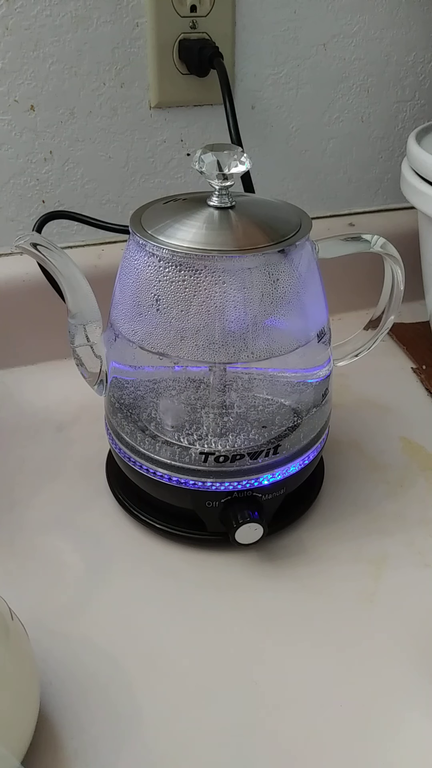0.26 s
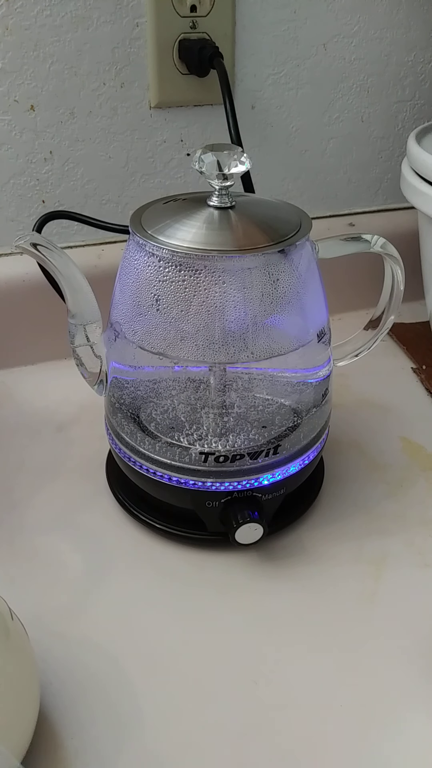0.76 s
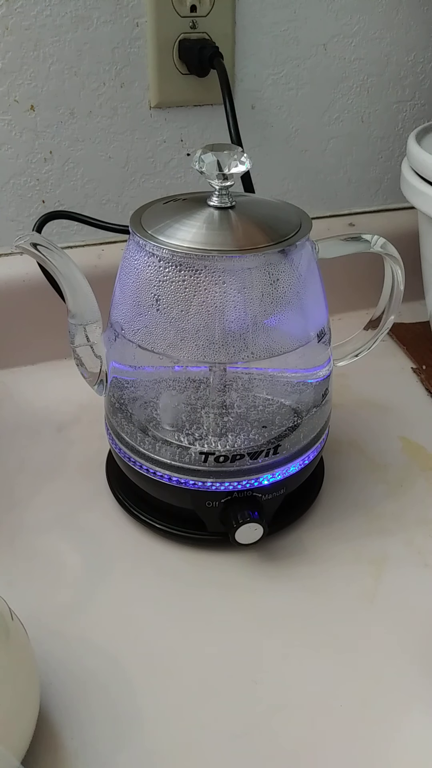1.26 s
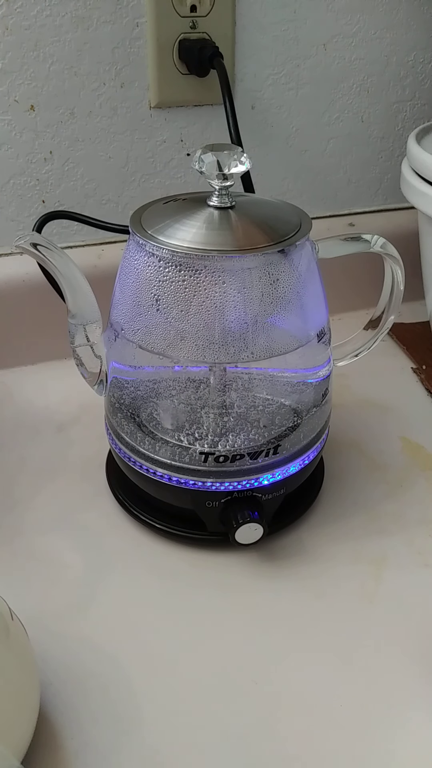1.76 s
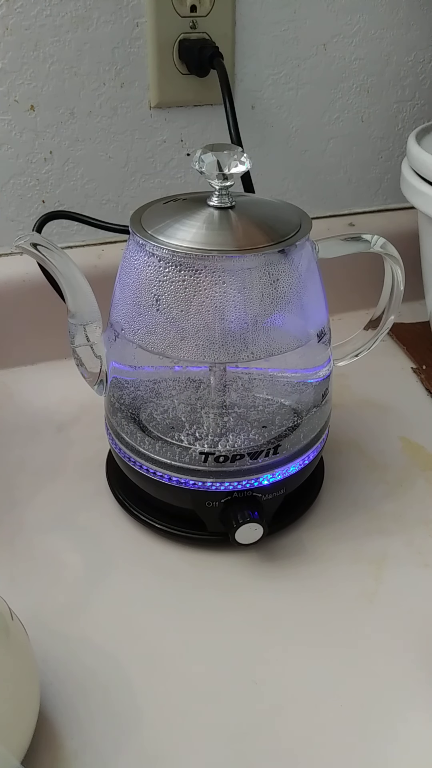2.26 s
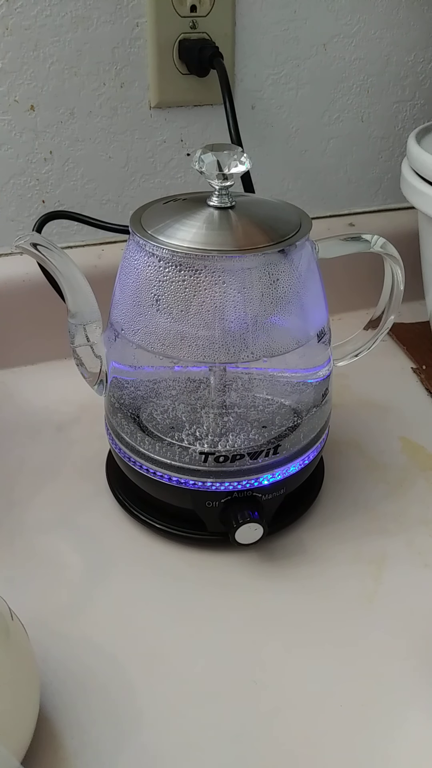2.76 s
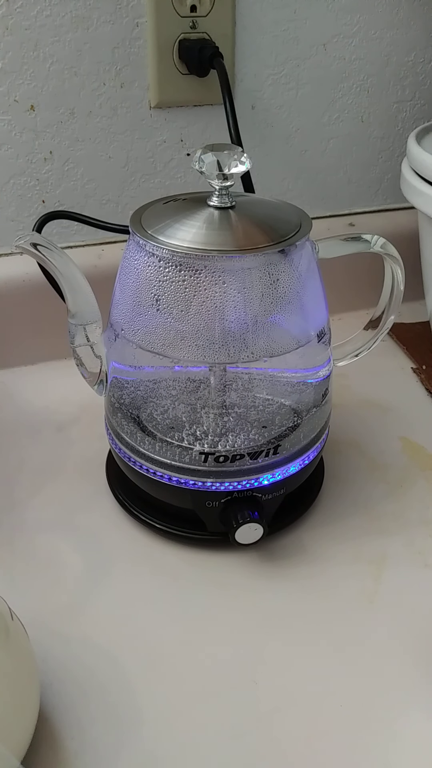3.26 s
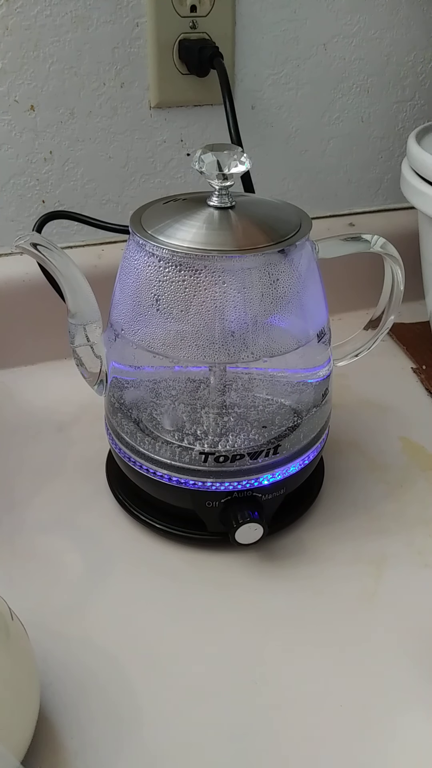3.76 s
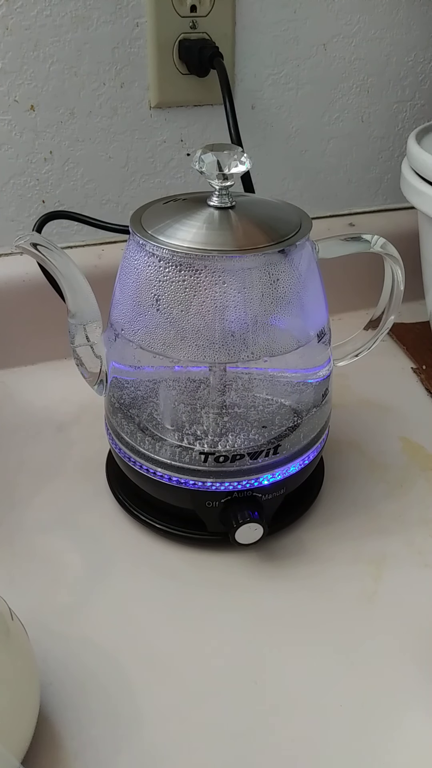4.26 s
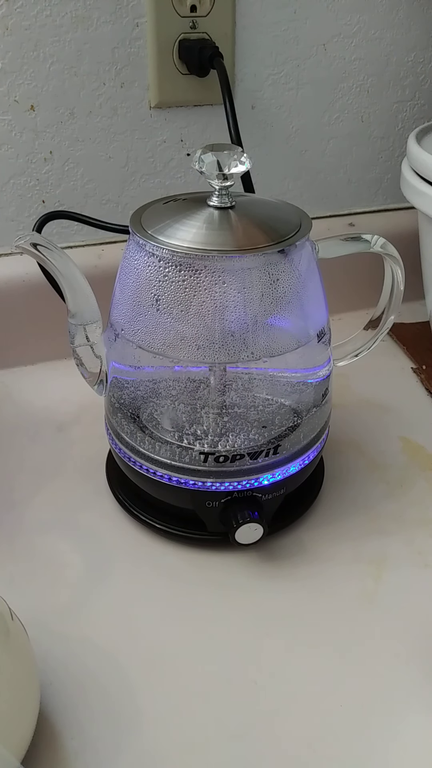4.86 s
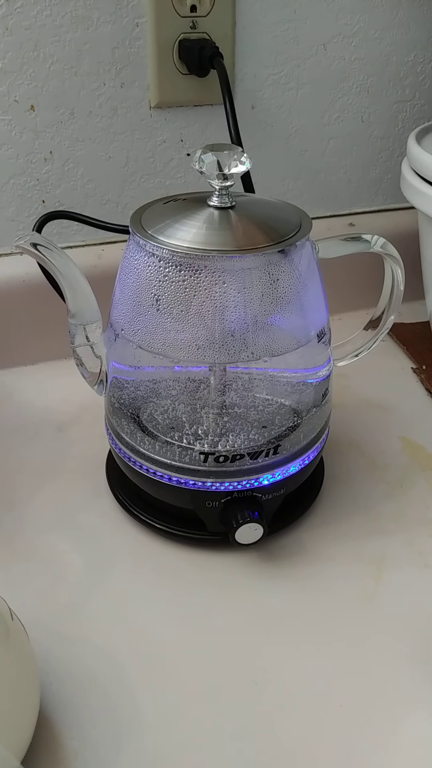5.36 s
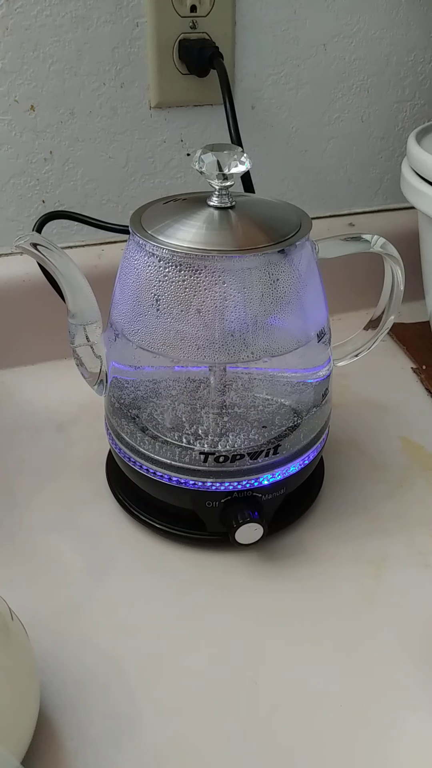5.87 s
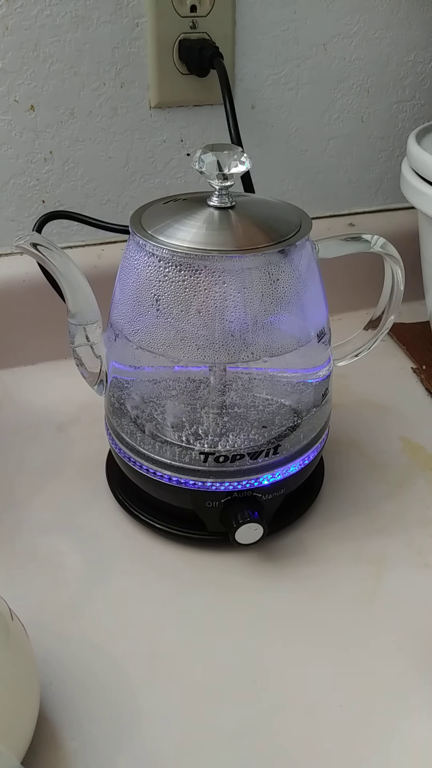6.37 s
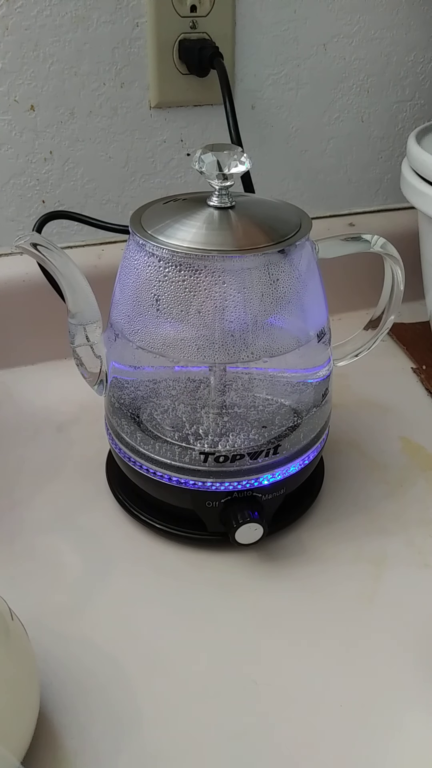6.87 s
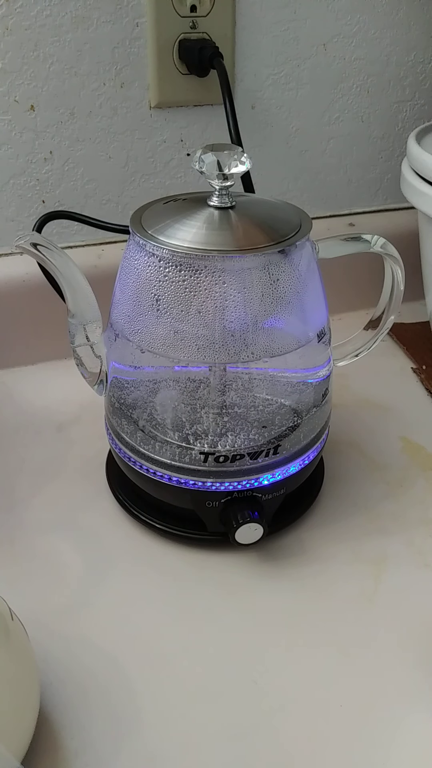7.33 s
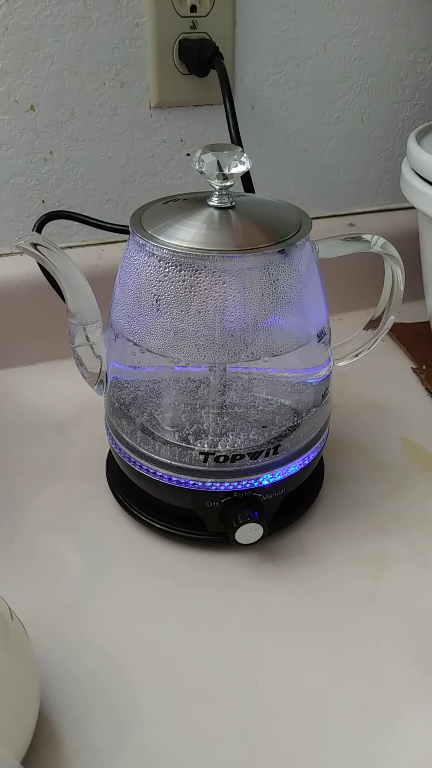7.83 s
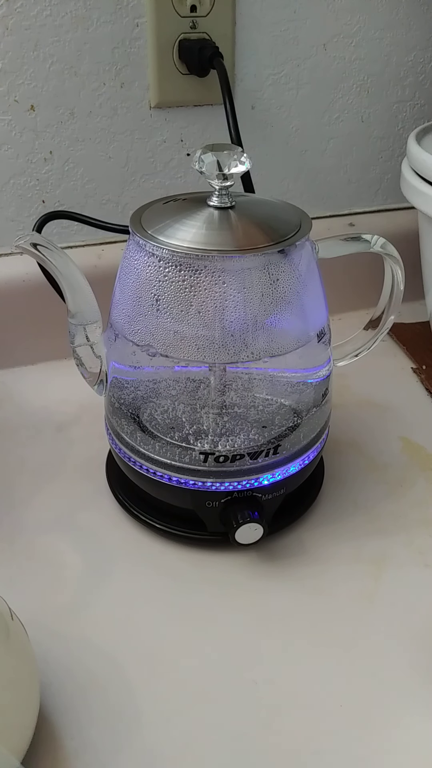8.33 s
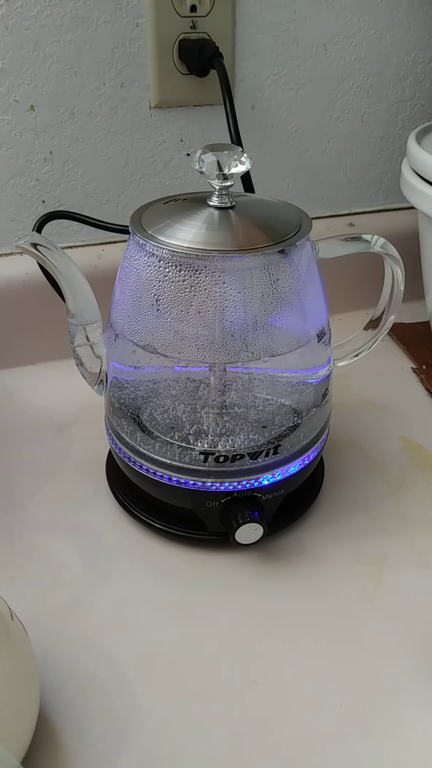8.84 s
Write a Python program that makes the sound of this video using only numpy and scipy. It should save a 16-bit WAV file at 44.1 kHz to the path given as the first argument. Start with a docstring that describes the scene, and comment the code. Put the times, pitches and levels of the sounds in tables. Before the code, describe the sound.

Close up, a glass kettle at a rolling boil grumbles and knocks, with sizzling sprays of fine bubbles and one dry tick.

```python
"""A low, uneven rumble and a glassy hiss come first: water boiling hard in a glass kettle, close to a phone.
Steam bubbles collapse on the heater plate and thump the kettle body; decaying modes make its knock.
Sprays of tiny bubbles are shaped noise that makes glass and steel sizzle; single bubbles plop and sing.
A dry tick of the casing comes once. The mains hums faintly under the quiet kitchen, and the counter and
walls return a short dull tail."""
import sys
import numpy as np
from scipy import signal
from scipy.fft import rfft, irfft
from scipy.io import wavfile
from scipy.ndimage import uniform_filter1d

SR = 44100
rng = np.random.default_rng(int(sys.argv[2]) if len(sys.argv) > 2 else 0)


def to_wav(s):
    """Save 16-bit WAV."""
    ch = np.atleast_2d(s).T  # columns
    pcm = np.round(np.clip(ch, -1, 1) * 32767)  # PCM
    wavfile.write(sys.argv[1], SR, pcm.astype(np.int16))


N = 401310  # samples

# large bubbles collapsing: start_s, peak_db, pitch_hz, snap_db (against the thump)
THUMPS = [(0.037, -22, 252, -10.5), (0.168, -23.5, 254, -2.5), (0.199, -20, 344, -15),
          (0.526, -16.5, 328, -13.5), (0.786, -15, 333, -9), (0.883, -29.5, 248, -1),
          (1.035, -20.5, 323, -1.5), (1.049, -13, 350, -6.5), (1.311, -26.5, 348, -4),
          (1.886, -22.5, 293, -21), (2.178, -25.5, 342, -0.5), (2.203, -26, 270, -20),
          (2.309, -21.5, 308, -11), (2.966, -17, 363, -7.5), (3.065, -26, 249, -7.5),
          (3.261, -23, 357, -9.5), (3.364, -21, 262, -10), (3.504, -24, 392, -9), (3.841, -18.5, 377, -8),
          (4.14, -18.5, 257, -2.5), (4.35, -18.5, 345, -2), (4.492, -22.5, 328, -4.5),
          (4.768, -19.5, 260, -7), (4.979, -17.5, 325, -18), (5.032, -22.5, 335, -20),
          (5.657, -21, 276, -1.5), (5.795, -26.5, 340, -2), (5.873, -25, 260, -13.5),
          (5.915, -21.5, 296, -8), (6.023, -25, 360, -10.5), (6.093, -26.5, 348, -11),
          (6.11, -18.5, 284, -8.5), (6.19, -24, 254, -5.5), (6.31, -16.5, 352, 0), (6.354, -16.5, 301, -11),
          (6.484, -16, 390, -4.5), (6.788, -13.5, 324, -9.5), (6.889, -28, 261, -2),
          (7.112, -17, 273, -6.5), (7.402, -16, 370, -7), (7.43, -19, 290, -7.5), (7.67, -17.5, 275, -14),
          (7.715, -22, 334, -15), (7.787, -24, 304, -17), (8.056, -24.5, 277, -8.5),
          (8.147, -25.5, 344, -17), (8.318, -19, 296, -9.5), (8.339, -19.5, 265, -21.5),
          (8.631, -24.5, 338, -8), (8.715, -27.5, 336, -6), (8.845, -23.5, 229, -7),
          (8.904, -24.5, 272, -5.5), (9.066, -20, 340, -7)]
# modes of the kettle body and counter: mode_hz, level_db, t60_s
BODY = [(152, -7, 0.08), (214, -9, 0.09), (250, -2, 0.13), (272, -6, 0.1), (337, -3, 0.11),
        (365.3, -2.5, 0.065), (413.6, -4.5, 0.054), (478, -5.5, 0.053), (523.5, -11.5, 0.082),
        (607.6, -10.5, 0.072), (680, -6.5, 0.051), (807, -17, 0.08), (1030, -14.5, 0.045)]

SHED_SPREAD_DB = 9  # how far the bubbles that follow a large one differ in level
PLINK_CYCLES, PLINK_GLIDE = 1.6, .025  # decay in swings; share of its pitch gained with each swing


def amp(db):
    """Turn decibels into a factor on amplitude."""
    return 10 ** (np.asarray(db) / 20)


def level(x, db):
    """Set the RMS level in dB."""
    return x * amp(db) / np.sqrt(np.mean(x ** 2))


def peak(x, db):
    """Set the peak level in dB."""
    return x * amp(db) / np.abs(x).max()


def above(x, hz):
    """Keep what lies above a frequency."""
    return signal.sosfilt(signal.butter(3, hz, "high", fs=SR, output="sos"), x)


def add(out, s, piece):
    """Lay a piece into the sound at s seconds, cut off at the end."""
    i = int(s * SR)
    out[i:i + len(piece)] += piece[:max(N - i, 0)]


def coloured(points):
    """Steady noise at 0 dB RMS whose spectrum follows (Hz, dB) points."""
    hz, db = np.transpose(points)
    bins_hz = np.fft.rfftfreq(N, 1 / SR)
    gain = amp(np.interp(np.log(bins_hz + 1), np.log(hz), db))
    return level(irfft(rfft(rng.standard_normal(N)) * gain, N), 0)


def wander(db, s):
    """Gain that drifts at random by some dB (RMS), smoothed twice over s seconds."""
    size = int(s * SR)
    drift = uniform_filter1d(uniform_filter1d(rng.standard_normal(N), size), size)
    return amp(db * level(drift, 0))


def swarm(per_s, spread_db):
    """Rows (start_s, level_db, chance 0-1) of random events, most small and some larger."""
    draw = rng.random((int(per_s * N / SR), 3))
    start_s = draw[:, 0] * N / SR
    level_db = -spread_db * np.log(1 - .95 * draw[:, 1])
    return np.c_[start_s, level_db, draw[:, 2]]


def ring(modes, scatter_db=0.):
    """Response of decaying modes to one short push; where it lands shifts their strengths."""
    t = np.arange(SR // 7) / SR
    luck_db = scatter_db * rng.standard_normal(len(modes))
    out = np.zeros(len(t))
    for shift_db, (hz, db, t60) in zip(luck_db, modes):
        decay = amp(-60 * t / max(t60, .005))  # no mode dies faster than 5 ms
        out += amp(db + shift_db) * np.sin(2 * np.pi * hz * t) * decay
    return out


def bubble(hz, cycles, glide=0.):
    """A bubble swells into a few swings at its own pitch, perhaps rising, and dies."""
    turns = np.arange(int(12 * cycles * SR / hz)) / SR * hz
    swing = np.sin(2 * np.pi * turns * (1 + glide * turns / 2))
    return swing * turns * np.exp(-turns / cycles)


def stir():
    """Level of the boil: calm, lifted for a moment after each large bubble."""
    calm_db, lift_db, settle_t60_s = -39.5, -16.5, 0.21  # lift is against the bubble's peak
    t = np.arange(SR // 2) / SR
    power = np.full(N, amp(calm_db) ** 2)
    for s, db, _, _ in THUMPS:
        add(power, s, amp(db + lift_db - 60 * t / settle_t60_s) ** 2)
    return np.sqrt(np.abs(uniform_filter1d(power, size=SR // 200)))


def rumble():
    """Many smaller bubbles of all sizes, on several spots of the plate, keep the body grumbling."""
    out = 0
    for spot in range(3):
        push = np.zeros(N)
        for s, db, chance in swarm(170, spread_db=2.5):
            hz = 150 * (1200 / 150) ** chance
            add(push, s, amp(db) * (hz / 300) ** 0.43 * bubble(hz, cycles=0.79))
        out = out + signal.fftconvolve(push, ring(BODY, scatter_db=1.0))[:N]
    # the boil sags and swells between gulps
    return level(out, 0) * stir() * wander(2.5, 0.034)


def spray(hiss, sprays, fizz_db, t60, rise_s=0.0014):
    """One size of bubble: sprays start abruptly and thin out over a steady fizz."""
    t = np.arange(SR // 8) / SR
    fade = (1 - np.exp(-t / rise_s)) * amp(-60 * t / t60)
    power = np.full(N, amp(fizz_db) ** 2)
    for s, db in sprays:
        add(power, s, (amp(db) * fade) ** 2)
    # a spray is made of separate crackles: grains of 4 ms that differ by 1.5 dB
    grains = uniform_filter1d(rng.standard_normal(N), int(.004 * SR))
    crackle = amp(1.5 * level(grains, 0))
    # the mean hiss lies a few dB under its peaks
    return np.sqrt(power) * level(hiss * crackle, -8.5)


def glass_hiss():
    """Broad hiss of tiny bubbles drives the narrow resonances of glass and steel."""
    # broad colour of the sizzle: band_hz, level_db (per Hz, relative)
    hiss_colour = [(500, -22.5), (1100, 17), (1400, -5), (1900, 0), (2900, -15), (4200, -15), (6300, -12),
                   (7000, -17), (11000, -21.5), (12200, -30.5), (16000, -26)]
    # resonances of the glass wall and steel plate: ring_hz, width_hz, level_db (relative to each other)
    glass_modes = [(1035, 55, 1), (1650, 455, 4.5), (2330, 47, -1), (3203, 40, -1), (3844, 86, -2.5),
                   (4634, 110, -5.5), (4942, 50, -5), (5390, 40, -4), (5960, 40, -6), (6350, 50, -5),
                   (6570, 25, -2), (7140, 50, -2), (7800, 120, -3), (8110, 60, -6), (9620, 300, -12),
                   (10320, 60, -5), (10550, 55, -2), (10850, 70, -3), (11600, 120, -3)]
    hiss = coloured(hiss_colour)
    rings = np.zeros(N)
    for hz, width, db in glass_modes:
        tone = signal.lfilter(*signal.iirpeak(hz, hz / width, SR), hiss)
        # each ring of the glass swells and fades on its own
        rings += amp(db) * tone * wander(3.5, .018)
    return hiss + amp(8) * rings


def sizzle():
    """Coarse, middling and fine bubbles hiss in sprays, with pinpoint bubbles that burst all at once."""
    # large sprays: start_s, peak_db, fineness_db (treble above 7 kHz against the peak)
    large_sprays = [(0.0416, -45.5, -1), (0.188, -37, -4.5), (0.375, -43, -7), (0.5306, -36, -14),
                    (0.883, -35, -11), (0.959, -37.5, -21), (1.042, -36, -17), (1.227, -37, -24),
                    (1.371, -38, -4.5), (1.534, -40, -8), (1.604, -35, -19), (1.665, -43.5, -10),
                    (2.129, -43.5, -2), (2.161, -42.5, -2), (2.181, -42.5, -2), (2.312, -40.5, -5.5),
                    (2.515, -40, -21), (2.609, -37.5, -15), (2.6743, -38, -10), (2.94, -45.5, -2),
                    (2.978, -42, -9), (3.07, -42, -3), (3.299, -37.5, -8), (3.367, -38, -4.5),
                    (3.399, -41, -6), (3.589, -38.5, -11), (4.143, -33.5, -13), (4.25, -44, -7),
                    (4.403, -42, -6), (4.495, -40, -7.5), (4.771, -36.5, -12), (4.993, -41.5, -25),
                    (5.109, -42, -2.5), (5.581, -44, -15), (5.597, -38, -8), (5.66, -38.5, -8),
                    (5.917, -40.5, -9), (5.972, -48, 3), (6.001, -35.5, -9), (6.112, -42, -6),
                    (6.269, -46.5, -2), (6.326, -33, -13), (6.607, -46, -4), (6.721, -37.5, -9.5),
                    (6.816, -38, -5), (6.8668, -43, -2), (6.892, -38.5, -5), (7.115, -36.5, -8),
                    (7.3963, -33, -11), (7.592, -42, -25), (7.668, -38, -8.5), (7.8146, -40.5, -4),
                    (7.949, -35.5, -17), (8.042, -33, -12), (8.1443, -33.5, -7), (8.346, -41.5, 0),
                    (8.5096, -40.5, -11), (8.605, -35, -10), (8.6398, -38.5, -6), (8.721, -48, -2),
                    (8.805, -37.5, -13), (8.853, -37, -6), (8.9396, -40.5, -1), (9.065, -36.5, -13)]
    large_s, large_db, high_db = np.transpose(large_sprays)
    thump_s, thump_db, _, snap_db = np.transpose(THUMPS)
    hiss = glass_hiss()
    # each layer keeps all above its edge, without delay
    upper, top = (signal.sosfiltfilt(signal.butter(3, hz, "high", fs=SR, output="sos"), hiss)
                  for hz in (2600, 6900))

    # small sprays come between the large ones, each with its own mix of coarse, middling and fine
    small_s, small_db, _ = swarm(60, spread_db=2.5).T
    mix_db = small_db + 3 * rng.standard_normal((len(small_s), 3)).T + [[-54], [-53], [-66]]
    # each size starts up to 9.2 ms late
    mix_s = small_s + 0.0092 * rng.random((len(small_s), 3)).T

    # the snap of a large bubble throws a coarse splash 5 ms later
    coarse_s = np.r_[mix_s[0], large_s, thump_s + 0.005]
    splash_db = thump_db + snap_db - 13.5
    # finer sprays have less coarse sizzle
    coarse_db = np.r_[mix_db[0], large_db - 3 - 0.067 * high_db, splash_db]
    middling_s, middling_db = np.r_[mix_s[1], large_s], np.r_[mix_db[1], large_db]
    fine_s, fine_db = np.r_[mix_s[2], large_s], np.r_[mix_db[2], large_db + high_db]
    coarse = spray(hiss - upper, zip(coarse_s, coarse_db), fizz_db=-54.0, t60=0.14)
    middling = spray(upper - top, zip(middling_s, middling_db), fizz_db=-58.5, t60=0.14)
    fine = spray(top, zip(fine_s, fine_db), fizz_db=-75.0, t60=0.082, rise_s=0.0011)

    # pinpoint bursts: some anywhere, two around each large spray
    lone_s, lone_db, _ = swarm(18, spread_db=1.5).T
    lag, drop = rng.random((len(large_s), 2, 2)).T
    near_s = np.maximum(large_s + 0.102 * (lag - .5), 0)
    near_db = large_db + high_db - 6.5 * 2 * drop
    crisp_s = np.r_[lone_s, near_s.ravel()]
    crisp_db = np.r_[lone_db - 51, near_db.ravel()]
    crisp = spray(above(hiss, 4300), zip(crisp_s, crisp_db), fizz_db=-np.inf, t60=0.058, rise_s=.0004)
    return coarse + middling + fine + crisp


def hum():
    """Mains hum: one low sine whose level wavers a little."""
    hum_hz, hum_db, waver_db = 58, -55, 2.2  # RMS level ahead of the microphone
    waver = level(uniform_filter1d(rng.standard_normal(N), SR // 14), 0)
    tone = np.sqrt(2) * np.sin(2 * np.pi * hum_hz * np.arange(N) / SR)
    return amp(hum_db + waver_db * waver) * tone


def kitchen():
    """Still kitchen air and microphone hiss: steady noise, weightiest in the bass."""
    # spectrum of the quiet kitchen: band_hz, level_db (per Hz, relative)
    air_colour = [(30, -8), (80, -10.5), (120, -2), (300, -3.5), (1000, -19.5), (2000, -22), (4000, -30),
                  (8000, -44), (16000, -46)]
    return amp(-50.5) * coloured(air_colour)


def thumps():
    """Each large bubble swings, snaps shut, sheds two smaller ones and pushes the body at its own spot."""
    shed_db, shed_snap_db = -8.5, 1  # the shed bubbles against the large one; their snap against the large bubble's snap
    shed_from_s, shed_within_s = 0.008, 0.022
    out = np.zeros(N)
    snap = bubble(750., cycles=.33)
    for s, db, hz, snap_db in THUMPS:
        body = ring(BODY, scatter_db=3.5)
        # a bubble that snaps hard is over sooner than one that sags
        cycles = np.clip(.3 - snap_db / 20, .2, 2)

        def push(pitch_hz):
            return peak(signal.fftconvolve(bubble(pitch_hz, cycles), body)[:len(body)], db)

        knock = signal.fftconvolve(snap, body)[:len(body)]
        crack = peak(above(knock, 420), db + snap_db)
        add(out, s, push(hz) + crack)
        for lag, drop, pitch in rng.random((2, 3)):
            shed = push(hz * (.8 + .6 * pitch)) + amp(shed_snap_db) * crack
            add(out, s + shed_from_s + shed_within_s * lag, amp(shed_db - SHED_SPREAD_DB * drop) * shed)
    # the blow carries little treble above 3 kHz
    return signal.sosfilt(signal.butter(4, 3000, fs=SR, output="sos"), out)


def plinks():
    """Single small bubbles sing a short rising note; three gurgle after every large bubble."""
    # bubbles that sing out singly: start_s, peak_db, pitch_hz
    lone_notes = [(1.002, -37, 2180), (5.81, -33, 640), (5.998, -32.5, 556), (7.808, -40, 760),
                  (8.611, -40, 1830), (8.92, -38, 700)]
    gurgle_db, gurgle_within_s = -20, .045  # level against the large bubble
    out = np.zeros(N)
    for s, db, hz in lone_notes:
        add(out, s, peak(bubble(hz, cycles=PLINK_CYCLES, glide=PLINK_GLIDE), db))
    for s, db, _, _ in THUMPS:
        for lag, drop, pitch in rng.random((3, 3)):
            note = bubble(450 * 2.2 ** pitch, cycles=PLINK_CYCLES, glide=PLINK_GLIDE)
            add(out, s + gurgle_within_s * lag, peak(note, db + gurgle_db - SHED_SPREAD_DB * drop))
    return out


def plops():
    """A pair of small bubbles swing near a kilohertz, one just after the other, and leave the body ringing."""
    # small bubbles that plop against the body's highest mode: start_s, peak_db (of each of the pair)
    plop_pairs = [(0.5317, -32), (0.8851, -35), (1.145, -34.5), (6.316, -37), (8.043, -44), (8.1458, -38),
                  (8.635, -35), (8.7222, -35.5), (9.0647, -34)]
    out = np.zeros(N)
    for s, db in plop_pairs:
        for lag_s in (0, 0.0068):
            hz = 1057 * (1 + 0.02 * rng.standard_normal())
            plop = signal.fftconvolve(bubble(hz, cycles=1.35), ring(BODY))
            add(out, s + lag_s, peak(plop, db))
    return out


def tick():
    """One dry tick as the hot casing slips: a sharp knock and a short scrape into its modes."""
    # the hard tick: start_s, peak_db
    tick_s, tick_db = (3.6624, -15)
    # modes of the casing: mode_hz, level_db (relative), t60_s
    casing_modes = [(1730, -12, 0.013), (2600, -5, 0.006), (3100, 8, 0.0049), (3610, -3, 0.022),
                    (3920, 1, 0.012), (4100, 6, 0.013)]
    t = np.arange(SR // 20) / SR
    scrape = (t == 0) + 0.036 * rng.standard_normal(len(t)) * np.exp(-t / 0.01)
    # the casing passes on neither bass nor high treble
    casing = signal.butter(4, (1400, 4700), "band", fs=SR, output="sos")
    knock = signal.sosfilt(casing, signal.fftconvolve(scrape, ring(casing_modes)))
    out = np.zeros(N)
    add(out, tick_s, peak(knock, tick_db))
    return out


def room_tail(kettle):
    """The counter and walls return a short dull tail: smoothed, decaying noise from 4 ms on."""
    t = np.arange(SR // 3) / SR
    dull = level(uniform_filter1d(rng.standard_normal(len(t)), 4), -52.5)
    tail = dull * amp(-60 * t / 0.099) * (t > .004)
    return signal.fftconvolve(kettle, tail)[:N]


def scene():
    """The kettle on its counter, with its reflections, the hum and the quiet kitchen."""
    # a body this small sends out little bass
    body = above(thumps() + plops() + rumble(), 155)
    kettle = body + sizzle() + plinks() + tick()
    return (kettle + room_tail(kettle) + hum() + kitchen())[None]


def record(dry):
    """The phone drops the deepest bass and cuts the top steeply."""
    steep_top = signal.ellip(10, .2, 80, 15800, fs=SR, output="sos")  # ripple dB, stop dB, edge Hz
    return signal.sosfilt(steep_top, above(dry, 52))


dry = scene()
out = record(dry)
to_wav(out)
```